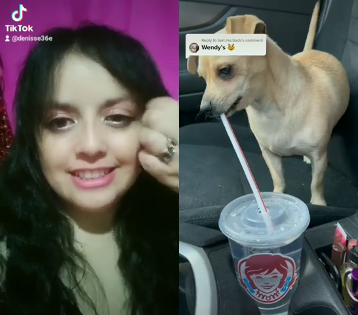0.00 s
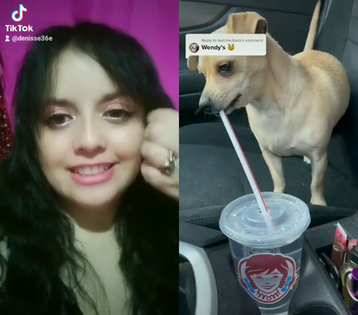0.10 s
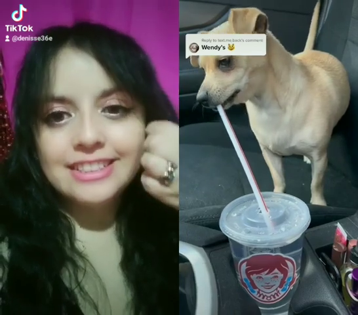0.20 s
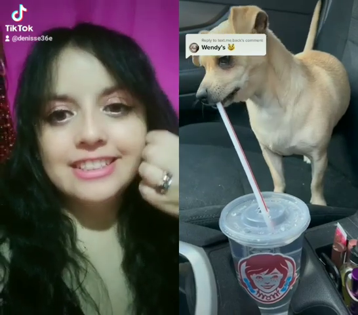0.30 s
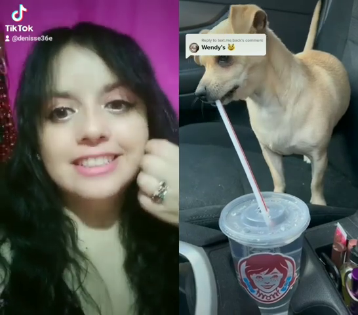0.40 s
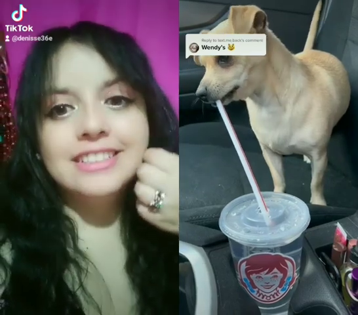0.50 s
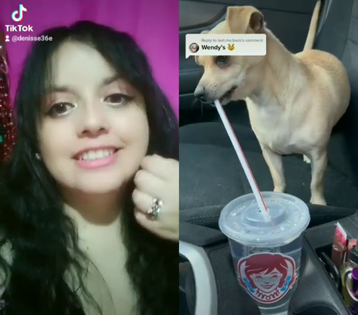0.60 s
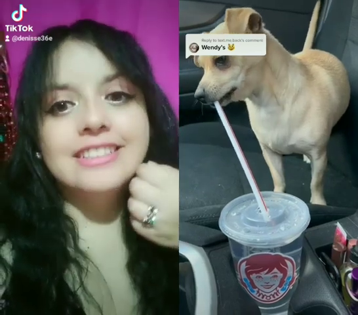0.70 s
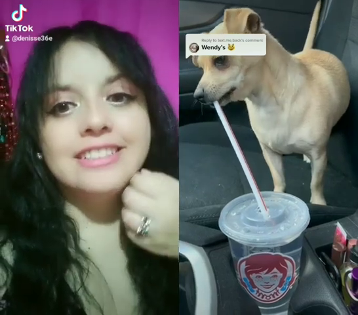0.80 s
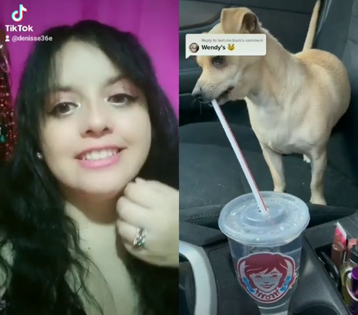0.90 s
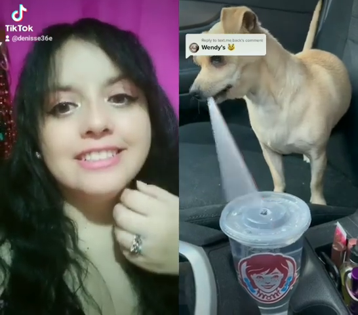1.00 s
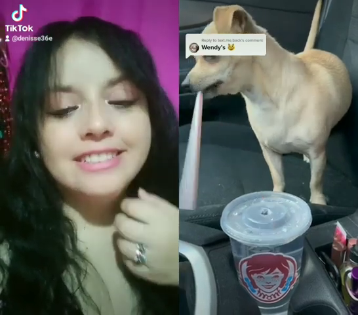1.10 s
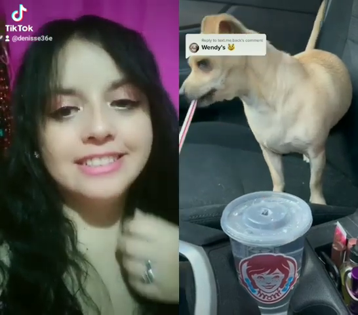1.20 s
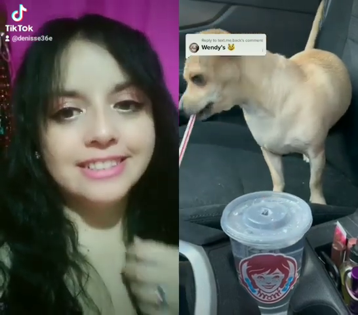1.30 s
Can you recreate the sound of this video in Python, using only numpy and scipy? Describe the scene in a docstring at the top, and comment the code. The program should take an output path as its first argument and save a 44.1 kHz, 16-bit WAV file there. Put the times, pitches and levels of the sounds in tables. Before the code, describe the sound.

A plastic straw creaks and clicks through a cup lid, then pops free in an idling car

```python
"""Straw tugged out of a cup lid

In an idling car, a small dog tugs a plastic straw out through the lid of an empty cup.
The straw sticks and slips in the slit: single slips click, runs of them creak, and all ring the lid's modes.
Between catches it slides, as coloured noise and thin sine squeals.
At last the end pops free: a burst of noise snaps, the cup's modes thump, and the flaps of the slit flick back.
Wavering sines make the engine hum, over noise coloured as cabin rumble and hiss."""
import sys
import numpy as np
from scipy import signal
from scipy.fft import rfft, irfft
from scipy.io import wavfile

SR = 44100
rng = np.random.default_rng(int(sys.argv[2]) if len(sys.argv) > 2 else 0)


def materialize(psi):
    """Save the field psi as 16-bit PCM at rate SR to the path in sys.argv[1].

    A 1-D psi becomes a single channel; in a 2-D psi each row is a channel.
    """
    bounded = np.clip(np.atleast_2d(psi).T, -1, 1)
    quanta = np.round(bounded * 32767).astype(np.int16)
    wavfile.write(sys.argv[1], SR, quanta)


N = 61740
T = np.arange(N) / SR  # s

# colour of a sharp plastic snap, for the pop and the flaps: frequency_hz, level_db
SNAP_COLOUR = [(500, -20), (1400, -6), (2500, 4), (3300, -12.5), (4400, 1.5), (5800, -10), (6800, 0.5),
               (8500, -13), (12000, -15.5), (15500, -18)]


def from_db(db):
    """Decibels to gain."""
    return 10 ** (np.asarray(db) / 20)


def rms_one(x):
    """Scale to rms 1."""
    return x / np.sqrt(np.mean(x ** 2) + 1e-20)


def colour(x, points):
    """Causal (minimum-phase) filter through (Hz, dB) points."""
    size = 2 * N
    hz, db = np.transpose(points)
    bin_hz = np.arange(N + 1) * SR / size
    gain = from_db(np.interp(np.log(bin_hz + 1), np.log(hz), db))
    # folding the cepstrum forward in time gives the minimum phase
    cepstrum = irfft(np.log(gain))
    cepstrum[1:N] *= 2
    cepstrum[N + 1:] = 0
    response = np.exp(rfft(cepstrum))
    return irfft(rfft(x, size) * response)[:N]


def drift(hz):
    """Random wander of spread 1, mostly slower than hz."""
    spectrum = rfft(rng.standard_normal(N))
    bin_hz = np.arange(len(spectrum)) * SR / N
    return rms_one(irfft(spectrum / (1 + (bin_hz / hz) ** 4), N))


def clicks(times_s, gains):
    """Impulses at the given times."""
    out = np.zeros(N)
    places = np.round(np.asarray(times_s) * SR).astype(int)
    np.add.at(out, np.clip(places, 0, N - 1), gains)
    return out


def struck(x, hz, t60_s):
    """A mode as the air hears it: clicks set it ringing, and it radiates little far below its pitch."""
    radius = np.exp(-np.log(1000) / (t60_s * SR))
    angle = 2 * np.pi * hz / SR
    return signal.lfilter([1, -1], [1, -2 * radius * np.cos(angle), radius ** 2], x + 1e-18)


def crack(x, t60_s):
    """Each click becomes a dying burst of noise of the same energy."""
    keep = np.exp(-2 * np.log(1000) / (t60_s * SR))  # energy left after one sample
    energy = signal.lfilter([1 - keep], [1, -keep], x ** 2 + 1e-18)
    return np.sqrt(energy) * rng.standard_normal(N)


def tail(t60_s):
    """A dying burst of noise with unit energy, to convolve with."""
    burst = rng.standard_normal(N) * np.exp(-np.log(1000) * T / t60_s)
    return burst / np.sqrt(np.sum(burst ** 2))


def soften(x, hz):
    """Low-pass: a yielding contact or soft surfaces dull the treble."""
    return signal.sosfilt(signal.butter(4, min(hz, SR / 3), fs=SR, output="sos"), x)


def car():
    """Engine orders that waver in level and phase, over the cabin's rumble and hiss."""
    # idling engine: frequency_hz, level_db (rms)
    engine_orders = [(26.7, -56), (53.5, -47), (80.0, -47), (113, -59.5), (216, -60)]
    # cabin noise: frequency_hz, level_db (shape only)
    cabin_colour = [(15, -14.5), (28, 3.5), (50, 1.5), (85, -0.5), (105, -2), (170, -6.5), (260, -11),
                    (450, -15.5), (700, -20), (1200, -35.5), (2500, -43), (6000, -52), (10000, -60.5),
                    (15000, -73)]
    waver = 0.2  # spread, as a share of level and in radians of phase
    hum = 0
    for hz, db in engine_orders:
        level = from_db(db) * np.sqrt(2) * (1 + waver * drift(hz=3.8))
        phase = 2 * np.pi * (hz * T + rng.random()) + waver * drift(hz=1.3)
        hum = hum + level * np.sin(phase)
    fade_in = np.minimum(T / 0.008, 1)
    cabin = from_db(-46.5) * rms_one(colour(rng.standard_normal(N), cabin_colour))
    return fade_in * hum + cabin


def cabin_echo(x):
    """The short, dull reverberation of an upholstered cabin: filtered noise dying away."""
    level_db, t60_s, delay_s, cut_hz = -16, 0.065, 0.0028, 8500
    noise = rng.standard_normal(N) * np.exp(-np.log(1000) * T / t60_s)
    echo = soften(noise * (T > delay_s), cut_hz)
    unit_echo = echo / np.sqrt(np.sum(echo ** 2))
    return from_db(level_db) * signal.fftconvolve(x, unit_echo)[:N]


def sliding():
    """Dry rubbing of the straw between catches, as coloured noise, with short unsteady squeals."""
    # rubbing loudness: time_s, level_db
    rub_level = [(0.0, -67.5), (0.14, -63), (0.19, -48), (0.225, -42), (0.25, -44), (0.285, -39.5),
                 (0.315, -51), (0.345, -65), (0.39, -53.5), (0.445, -45.5), (0.49, -64), (0.55, -83)]
    # rubbing tone: frequency_hz, level_db (shape only)
    rub_colour = [(150, -15), (330, 14), (650, 3), (1000, 6), (1500, -7.5), (2250, -12), (2900, -22),
                  (7000, -27.5), (11000, -60), (15000, -37.5)]
    # thin squeals: middle_s, length_s, first_hz, last_hz, level_db
    squeals = [(0.214, 0.045, 804, 807, -39), (0.227, 0.046, 1037, 993, -43),
               (0.26, 0.028, 908, 1009, -34.5)]
    s, db = np.transpose(rub_level)
    flutter_db = 2.2 * drift(hz=151)
    rub = rms_one(colour(rng.standard_normal(N), rub_colour))
    out = from_db(np.interp(T, s, db) + flutter_db) * rub
    for middle_s, length_s, first_hz, last_hz, level_db in squeals:
        progress = np.clip((T - middle_s) / length_s + .5, 0, 1)
        glide_hz = first_hz + (last_hz - first_hz) * progress
        pitch_hz = glide_hz * (1 + 0.017 * drift(hz=117))
        swell = np.sin(np.pi * progress)
        out += from_db(level_db) * swell * np.sin(2 * np.pi * np.cumsum(pitch_hz) / SR)
    return out


def flicks_and_taps():
    """Sharp flicks of the flaps and softer taps of the loose straw and the dog's teeth, as noise bursts."""
    # the slit's flaps flick back after the pop: time_s, level_db
    flap_flicks = [(1.0775, -19), (1.0828, -13.5), (1.0880, -12.5), (1.0935, -31), (1.1025, -18.5)]
    # soft taps: time_s, level_db
    soft_taps = [(0.047, -40), (0.092, -41), (1.236, -34.5), (1.2435, -31.5), (1.2945, -23), (1.302, -36),
                 (1.378, -34)]
    # tone of the taps: frequency_hz, level_db
    tap_colour = [(250, 7.5), (600, 8), (1100, 5), (2200, -4), (3200, -5), (5000, -6.5), (7500, -12.5),
                  (10000, -31), (15000, -34.5)]
    out = 0
    for rows, t60_s, tone in ((flap_flicks, 0.039, SNAP_COLOUR), (soft_taps, 0.036, tap_colour)):
        s, db = np.transpose(rows)
        out = out + colour(crack(clicks(s, from_db(db)), t60_s), tone)
    return out


def pop():
    """The straw's end leaves the slit: a bright snap and the hollow thump of the cup's modes."""
    # open cup and freed lid: frequency_hz, level_db, t60_s
    cup_modes = [(160, -24, 0.1), (216, -28, 0.23), (284.6, -25.5, 0.11), (460, -12.5, 0.027),
                 (604, -13.5, 0.04), (785, -19, 0.033), (1190, -13, 0.023), (1390, -19, 0.023),
                 (2080, -32, 0.017)]
    thump_db, snap_db = 1, 1  # trims on the two parts
    blow = clicks([1.0716], 0.86)
    thump = 0
    for k, (hz, db, t60_s) in enumerate(cup_modes):
        sign = (-1) ** k  # neighbouring modes start in opposite directions
        thump = thump + sign * from_db(thump_db + db) * struck(blow, hz, t60_s)
    snap = colour(crack(blow, t60_s=0.027), SNAP_COLOUR)
    return soften(thump, hz=2480) + from_db(snap_db) * snap


def slips():
    """Every catch and release of the straw, alone or in a run: times, levels, brightness, grit."""
    # runs of slips, heard as creaks: start_s, length_s, first_rate_hz, last_rate_hz, level_db,
    # swell_s, fade_s, roughness (0-1), brightness_db_per_octave, grit_db
    creak_runs = [ (0.202, 0.057, 303.4, 264, -16, 0.017, 0.045, 0.27, -1, -5),
                  (0.2694, 0.018, 355.7, 336, -2.5, 0.0086, 0.0057, 0, -3.5, -13),
                  (0.398, 0.034, 363.5, 352, -4, 0.02, 0.014, 0.03, -0.9, -10.5),
                  (0.4570, 0.016, 358.4, 330, -3, 0.001, 0.012, 0.2, -1, -2),
                  (0.628, 0.0344, 228.6, 212.7, 2.5, 0.014, 0.0081, 0.06, -0.5, 1.5),
                  (0.9337, 0.043, 207.6, 201.2, 3.5, 0.0064, 0.009, 0.01, -0.24, 1),
                  (1.0488, 0.014, 389, 425.5, 3.5, 0.003, 0.001, 0.12, 1, -5), ]
    # clicks of single slips: time_s, level_db, brightness_db_per_octave, grit_db
    single_slips = [ (0.1515, -13.5, 0.5, -4), (0.4105, -2.5, 2.5, -2.5), (0.4220, -4.5, 1.5, -7),
                    (0.4382, -24.5, -10, -3), (0.4490, -13, -9, -3), (0.458, 3.5, -2, -7),
                    (0.5131, -4, 0, -7), (0.593, -0.5, 2, -6), (0.599, -3, -5, -6),
                    (0.6101, -10.5, 1.5, 3.5), (0.7736, -2, -5.5, 1), (0.7915, -4, 3, -3),
                    (0.8051, -9.5, -1, -6), (0.8685, -23.5, 4, -13), (0.927, -8, -2, -5.5),
                    (0.9860, -19.5, -13, 11), (1.008, -10.5, -4, -6), (1.0612, 1.5, 6.5, 6.5), ]
    rows = [np.array(single_slips, float)]
    for start_s, length_s, first_hz, last_hz, db, swell_s, fade_s, rough, bright, grit_db in creak_runs:
        early, strong = rng.standard_normal((2, 24))  # unevenness of up to 24 slips
        k = np.arange(len(early))
        rate_hz = np.interp(k / first_hz, [0, length_s], [first_hz, last_hz])
        period = 1 / rate_hz
        age = np.cumsum(period) - period
        swell = np.clip((age + period / 2) / swell_s, 1e-4, 1)
        fade = np.clip((length_s - age) / fade_s, 1e-4, 1)
        # roughness scatters both strength and timing
        level_db = db + 20 * np.log10(swell * fade) + 12 * rough * strong
        times_s = start_s + age + rough * period * early
        run = np.column_stack([times_s, level_db, bright + 0 * k, grit_db + 0 * k])
        rows.append(run[age < length_s])
    return np.vstack(rows).T


def straw_in_lid():
    """Slips ring the lid's modes, and each brings a small crack of dense high modes and friction."""
    # lid with the straw in it: frequency_hz, level_db, t60_s
    lid_modes = [(217, -38.5, 0.05), (290, -35, 0.042), (337.4, -30.5, 0.045), (457, -31, 0.026),
                 (578.3, -27.5, 0.045), (669, -30.5, 0.049), (805, -34, 0.04), (1028, -30.5, 0.024),
                 (1273, -31.5, 0.017), (1439, -34, 0.016), (1614, -39, 0.024), (1824, -42, 0.027),
                 (2100, -46, 0.023), (2270, -44, 0.026), (2460, -63, 0.025), (2630, -49, 0.033)]
    # crack of each slip: frequency_hz, level_db
    grit_colour = [(600, -26.5), (1500, 7), (2550, 3), (2850, -4), (3300, -10.5), (4200, -8.5),
                   (5500, -16.5), (7400, -11), (9500, -24.5), (12000, -38), (14500, -28), (16000, -39)]
    mode_scatter_db = 2
    grit_trim_db, grit_t60_s = -14, 0.047
    alike = 0.98  # share of the crack's energy that is the same in every slip
    s, db, bright, grit_db = slips()
    scatter = rng.standard_normal((200, len(lid_modes)))[:len(s)]
    body = 0
    for k, (hz, mode_db, t60_s) in enumerate(lid_modes):
        tilt_db = bright * np.log2(hz / 700)
        gains = from_db(db + mode_db + tilt_db + mode_scatter_db * scatter[:, k])
        sign = (-1) ** k  # neighbouring modes start in opposite directions
        body = body + sign * struck(clicks(s, gains), hz, t60_s)
    bites = clicks(s, from_db(db + grit_db + grit_trim_db))
    same_crack = signal.fftconvolve(bites, tail(grit_t60_s))[:N]
    own_crack = crack(bites, grit_t60_s)
    grit = np.sqrt(alike) * same_crack + np.sqrt(1 - alike) * own_crack
    return soften(body, hz=2800) + colour(grit, grit_colour)


def scene():
    """Cup and car, nearly mono; scattered reflections that differ between the ears widen the treble a little."""
    # stereo width: frequency_hz, side_over_mid_db
    width = [(100, -63), (250, -53), (600, -20.5), (2000, -23.5), (4200, -15), (8000, -16), (13000, -13)]
    cup = straw_in_lid() + sliding() + pop() + flicks_and_taps()
    mid = cup + cabin_echo(cup) + car()
    side = colour(signal.fftconvolve(mid, tail(t60_s=0.18))[:N], width)
    return np.array([mid + side, mid - side])


def record(dry):
    """A steep low-pass removes the top above 15.9 kHz."""
    return signal.sosfilt(signal.ellip(10, .1, 80, 15900, fs=SR, output="sos"), dry)


dry = scene()
out = record(dry)
materialize(out)
```